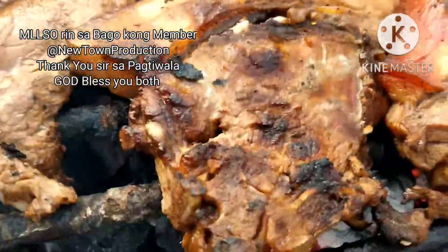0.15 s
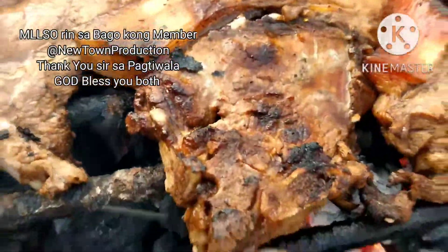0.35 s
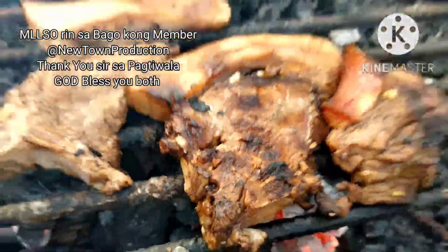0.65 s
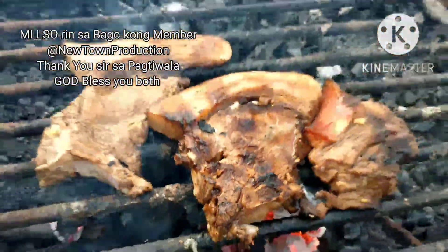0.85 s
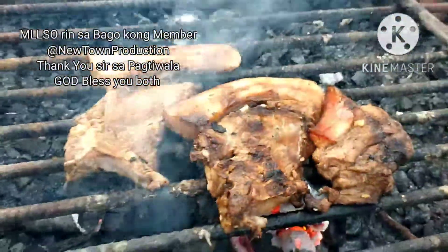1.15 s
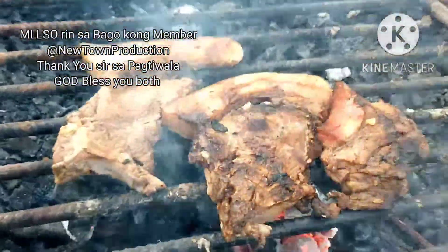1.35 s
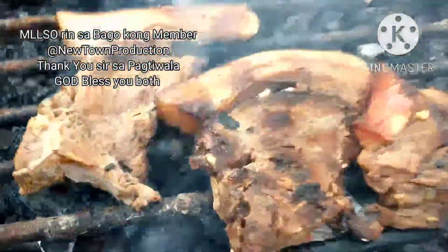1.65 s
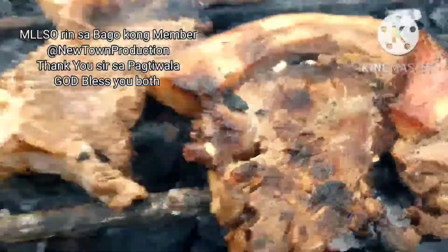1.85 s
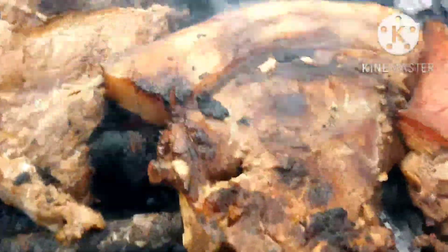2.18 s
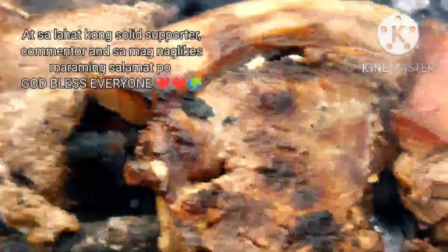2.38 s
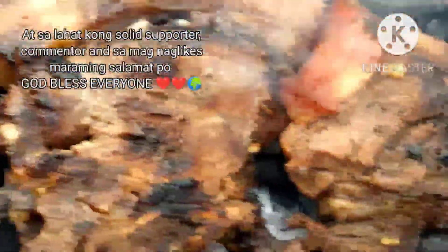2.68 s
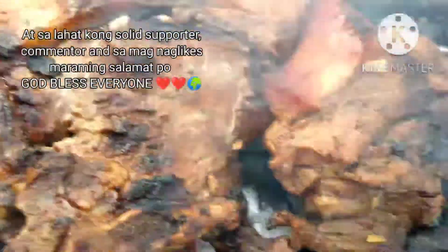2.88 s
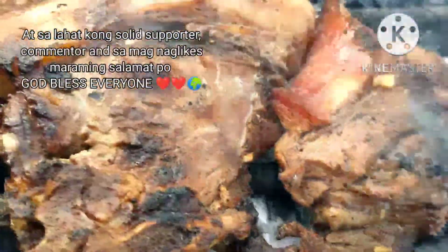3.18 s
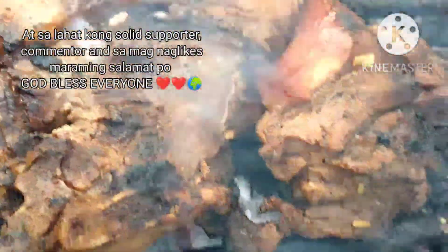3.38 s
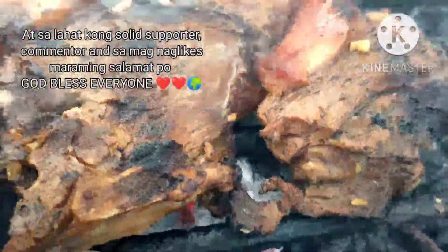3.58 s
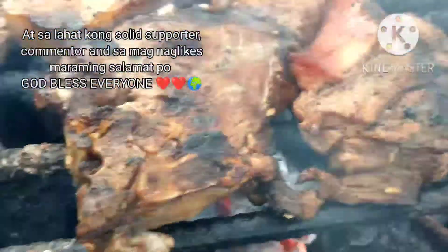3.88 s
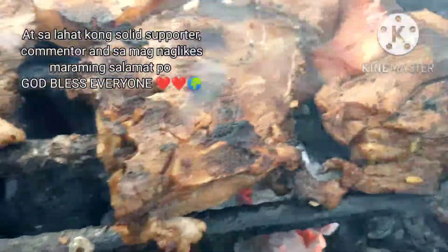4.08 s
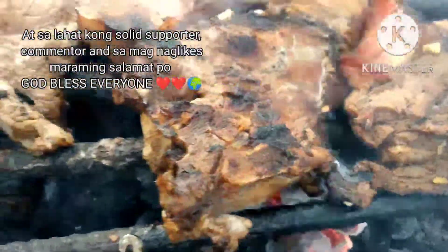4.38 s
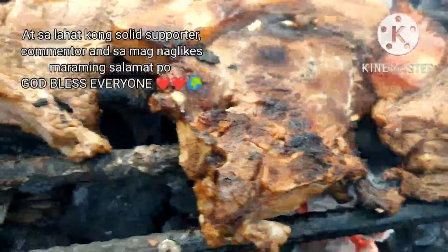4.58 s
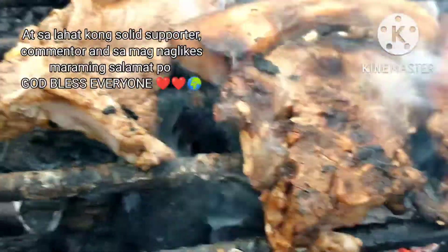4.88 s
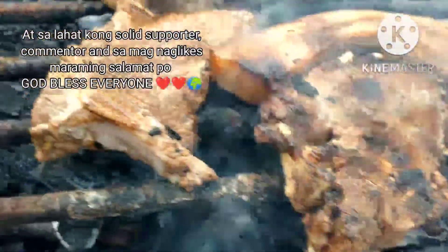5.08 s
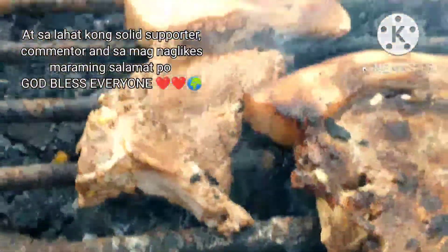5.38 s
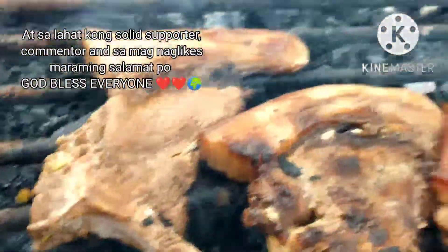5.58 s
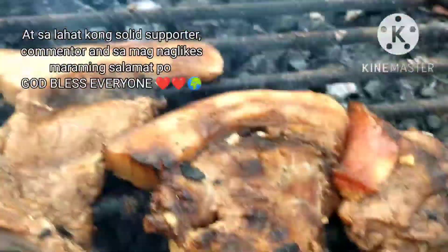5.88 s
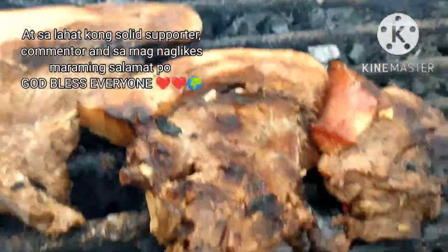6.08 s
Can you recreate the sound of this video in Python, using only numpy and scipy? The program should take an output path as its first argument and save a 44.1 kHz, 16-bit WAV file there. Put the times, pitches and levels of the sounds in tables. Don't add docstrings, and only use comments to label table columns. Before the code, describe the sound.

Meat sizzles over charcoal, close to a hand-held phone outdoors. A bright fizz of tiny bubbles runs throughout over a soft rush of embers and air, with uneven low handling rumble and a very faint far motor. A pop and steam spit open the scene; at 0.3 s a hard, loud knock on the phone coincides with a sharp crack, and a softer thud follows at 0.6. Small pops continue to 1.0, where the treble briefly dulls. From 1.25 to 1.8 the sizzle thins; a far rooster crows faintly until 2.5, with hollow spits at 1.6 and 1.9. Frying swells, fullest around 3.2. A strong snap and hissing jet burst at 3.7, then many ticks. Faint low bird calls come at 4.2 and 4.8, thin whistles from 4.5. Scuffs and a crisp double pop land at 4.8-5.0, with a weak second crow after 5.0. Two more pops at 6.0 close it, sizzle continuing.

```python
import sys
import numpy as np
from scipy import signal
from scipy.fft import rfft, irfft
from scipy.io import wavfile
from scipy.ndimage import uniform_filter1d

SR = 44100
rng = np.random.default_rng(int(sys.argv[2]) if len(sys.argv) > 2 else 0)


def nominal_scale(level):
    x = np.asarray(level, float) / 20
    return 10 ** x


def waveform_to_disk(signal):
    frames = np.transpose(np.atleast_2d(signal))
    scaled = np.clip(frames, -1, 1) * 32767
    samples = np.round(scaled).astype(np.int16)
    wavfile.write(sys.argv[1], SR, samples)


N = 275602
USUAL_FRYING_DB, USUAL_HAND_DB = -65, -75


def evened(x):
    return x / np.sqrt(np.mean(x ** 2) + 1e-20)


def read(points, hz):
    f, value = np.transpose(points)
    return np.interp(np.log(hz + 1), np.log(f + 1), value)


def add(mix, s, sound):
    part = mix[max(round(s * SR), 0):][:len(sound)]
    part += sound[:len(part)]


def bump(hz, centre_hz, octaves):
    return -6 * (np.log2((hz + 1) / centre_hz) / octaves) ** 2


def coloured(x, gain_db):
    db = np.maximum(gain_db(abs(np.fft.fftfreq(1024, 1 / SR))), -90)
    minimum_phase = np.exp(np.conj(signal.hilbert(np.log(nominal_scale(db)))))
    taps = np.fft.ifft(minimum_phase).real
    return signal.oaconvolve(x, taps[:512])[:len(x)]


def slow(hz):
    return evened(signal.sosfilt(signal.butter(2, hz, fs=SR, output="sos"), rng.standard_normal(N)))


def patchy(x, depth_db):
    z = signal.stft(x, nperseg=1024, noverlap=768)[2]
    patches = uniform_filter1d(rng.standard_normal(z.shape), 6, 0)
    patches = evened(uniform_filter1d(patches, 10, 1))
    return signal.istft(z * nominal_scale(depth_db * patches), nperseg=1024, noverlap=768)[1][:N]


# t/s, frying level/dB, hand level/dB
FRYING = [(0.0, -64, -57), (0.1, -65, -71), (0.55, -62, -75), (0.68, -64, -71.5), (1.25, -73.5, -85),
          (1.56, -72.5, -78.5), (1.77, -68, -72), (2.21, -68, -78), (2.47, -64.5, -74.5),
          (2.82, -63.5, -76), (3.15, -59, -74), (3.48, -63, -77.5), (3.9, -60, -75), (4.61, -66, -78.5),
          (4.84, -63.5, -68), (5.53, -66.5, -83), (5.83, -68, -78.5), (6.25, -64, -75)]


def control(column, s):
    table = np.transpose(FRYING)
    return np.interp(s, table[0], table[column])


def curve(column):
    return nominal_scale(control(column, np.arange(N) / SR))


# f/Hz, level/dB
PORT = [(400, -23), (2500, -28.5), (3600, -24), (4900, -24.5), (5700, -20.5), (6500, -14), (7400, -5.5),
        (7900, -7.5), (8770, -3), (9500, -7.5), (10500, -16), (11800, -26.5), (14800, -30.5), (16500, -33)]


def port_db(hz):
    return read(PORT, hz)


def fizz():
    bubbles_per_s, spread_db, steam_share = 2000, 4.5, 0.79
    chance = bubbles_per_s * np.exp(0.32 * slow(28)) / SR
    size = nominal_scale(spread_db * np.minimum(rng.exponential(1, N), 5)) * rng.choice([-1, 1], N)
    bubbles = evened(size * (rng.random(N) < chance))
    steam = rng.standard_normal(N) * nominal_scale(2.9 * slow(60))
    sizzle = coloured(bubbles + steam_share * steam, port_db)
    return curve(column=1) * nominal_scale(-1.5) * evened(patchy(sizzle, depth_db=1.5))


# f/Hz, level/dB
WASH = [(300, 4), (420, 3.5), (750, 4.5), (1630, -4), (2500, -1), (3700, -1.5), (4900, -9.5), (6000, -11),
        (11000, -12.5), (16000, -12.5)]


def ember_wash(air):
    wash = irfft(air * nominal_scale(read(WASH, HZ)) * (HZ > 250), N) * nominal_scale(1.2 * slow(30))
    s = np.arange(N) / SR
    frying = 0.3 * (control(1, s) - USUAL_FRYING_DB)
    hand = 0.15 * (control(2, s) - USUAL_HAND_DB)
    return nominal_scale(-80.5 + frying + hand) * nominal_scale(1.5) * evened(patchy(wash, depth_db=3.0))


# f/Hz, level per Hz/dB
RUMBLE = [(18, -47.5), (30, -19), (43, -17), (83, -2.5), (172, 2), (302, -16.5), (400, -20), (520, -43.5),
          (880, -120)]


def hand_rumble(air):
    rumble = evened(irfft(air * nominal_scale(read(RUMBLE, HZ)), N))
    return rumble * curve(column=2) * nominal_scale(-1.0 + 1.5 * slow(8.7))


# f/Hz, width/Hz, level/dB
HUM = [(120, 12, -90), (168, 10, -81.5), (192, 3.1, -88), (215, 8, -86.5)]


def motor_hum():
    lines = np.zeros(len(HZ))
    for f, width, db in HUM:
        lines += nominal_scale(db) / np.sqrt(width + width * ((HZ - f) / (width / 2)) ** 4)
    return irfft(rfft(rng.standard_normal(N)) * lines * np.sqrt(SR / 2), N)


HZ = np.fft.rfftfreq(N, 1 / SR)


def jet(length, low_db, centre_hz, upper_db, hiss_db):
    t = np.arange(6000) / SR / length
    shape = np.minimum(t / .22, 1) * np.exp(-1.5 * t ** 2.0)
    noise = rng.standard_normal((4, 6000))
    sputter = nominal_scale(2.6 * evened(uniform_filter1d(noise[3], 45)))

    def modes(f):
        return 1.5 * np.cos(f / 190 + 3 * noise[3, 0])

    def low_hollow(f):
        return bump(f, centre_hz, 0.91) + bump(np.maximum(f, 2000), 2000, .45)

    def hiss_colour(f):
        return np.maximum(port_db(f), -26 - 3.5 * (f > 9000) - 3.0 * (f > 13000))

    low = coloured(coloured(noise[0] * sputter, low_hollow), modes)
    upper = coloured(noise[1] * sputter, lambda f: bump(f, 3450, .3) + modes(f))
    hiss = coloured(noise[2] * sputter, hiss_colour)
    return shape * (nominal_scale(low_db) * evened(low) + nominal_scale(upper_db) * evened(upper) + nominal_scale(hiss_db) * evened(hiss))


# t/s, length/s, low hollow level/dB, upper hollow level/dB, hiss level/dB
SPITS = [(.006, 0.055, -66.5, -60, -43), (0.298, .016, -80.5, -80, -52), (0.883, .028, -81, -68.5, -56.5),
         (0.976, 0.026, -83.5, -61, -47), (1.598, 0.048, -56, -56.5, -50.5), (1.619, 0.04, -68, -66, -63),
         (1.897, 0.023, -70, -68.5, -54), (1.905, .023, -47, -47, -41.5), (1.929, 0.049, -67.5, -73, -62.5),
         (2.302, 0.033, -86, -89, -54), (2.4, 0.072, -94, -89, -58.5), (2.833, .029, -75.5, -71.5, -60),
         (3.033, 0.031, -84.5, -68, -50.5), (3.061, 0.07, -81.5, -71.5, -57.5),
         (3.47, .013, -70.5, -77, -67), (3.66, 0.069, -57.5, -58.5, -39.5),
         (3.843, .007, -68.5, -67, -68.5), (4.348, .031, -71.5, -71, -61), (4.651, .05, -85, -85, -60),
         (1.607, .014, -80, -60, -46), (4.898, .04, -65, -66, -47), (5.144, 0.02, -84.5, -75, -52.5),
         (5.972, 0.024, -72.5, -68, -45), (0.101, 0.025, -65, -67.5, -59), (0.669, 0.031, -72, -73, -58)]


def spits(mix):
    for s, length, low_db, upper_db, hiss_db in SPITS:
        add(mix, s, jet(length, low_db, 1400, upper_db, hiss_db))


# t/s, length/s, low hollow level/dB, its centre f/Hz, upper hollow level/dB
SCUFFS = [(0.3188, 0.02, -36, 800, -41), (.335, 0.036, -52, 700, -59.5), (.01, 0.069, -61.5, 540, -67),
          (.4, 0.03, -67.5, 1264, -68.5), (1.311, 0.038, -67.5, 850, -80), (1.539, 0.032, -69, 1286, -79),
          (1.606, .014, -43, 950, -45), (1.839, 0.03, -67, 700, -79.5), (2.424, .05, -72, 400, -81),
          (2.505, 0.024, -59, 987, -57.5), (3.13, 0.034, -55.5, 1400, -61),
          (3.6734, 0.0026, -36, 1400, -38), (3.7575, 0.016, -53, 1400, -59),
          (3.917, 0.0079, -63, 1202, -77), (3.991, 0.11, -74, 1180, -75), (4.652, 0.05, -66, 1300, -70),
          (4.799, .055, -57, 600, -63), (4.819, 0.017, -58, 905, -53.5), (4.9815, 0.026, -46, 600, -57),
          (5.308, 0.014, -56, 1000, -60), (0.622, 0.042, -58, 400, -90), (.681, 0.036, -61.5, 905, -70)]


def scuffs(mix):
    for s, length, low_db, centre_hz, upper_db in SCUFFS:
        add(mix, s, jet(length, low_db, centre_hz, upper_db, upper_db - 3))


def pop(db, ring_hz, snap_db):
    t = np.arange(1800) / SR
    noise = rng.standard_normal((3, len(t)))
    centres_s = np.array([[.0008], [.0025], [.0004]])
    swell = np.exp(-((t - centres_s) / .00042) ** 2)
    crack = 1.8 * noise[0] + 0.85 * np.cos(2 * np.pi * ring_hz * t)
    crack = crack * (swell[0] + 0.3 * swell[1])
    droplets = nominal_scale(3.5 * evened(uniform_filter1d(noise[2], 30)))
    spray = nominal_scale(-15.5 - 60 * t / 0.078) * noise[1] * droplets * (t > .001)

    def ring_colour(f):
        peak = .85 * port_db(f) + bump(f, ring_hz, .6)
        low_side = bump(np.minimum(f, 6000), 6000, .8)
        high_side = bump(np.maximum(f, 11500), 11500, .25)
        return np.maximum(peak, port_db(f) - 2 + low_side + high_side)

    def snap_colour(f):
        return np.maximum(bump(f, 11500, .2) - 4, bump(f, 5600, .3) - 4)

    ring = coloured(crack + spray, ring_colour)
    snap = coloured(noise[2] * swell[2], snap_colour)
    return nominal_scale(db) * (ring / abs(ring).max() + nominal_scale(snap_db + 5.5) * snap / abs(snap).max())


# t/s, peak level/dB, ring f/Hz, level of the wide snap before it/dB
POPS = [(0.0214, -23.5, 7270, -23), (.2838, -40, 8600, -20), (0.3116, -14, 9300, -19),
        (0.328, -23, 7300, -22), (.3205, -30, 8700, -45), (0.3705, -38, 7360, -20),
        (0.4742, -39.5, 7760, -35), (.61, -39.5, 8040, -36), (0.6528, -39.5, 8340, -27),
        (.7023, -33.5, 7580, -40), (.8824, -38, 7500, -28), (0.9785, -29.5, 7550, -45.5),
        (.9874, -40.5, 7700, -43), (1.0078, -41.5, 7660, -39), (1.2573, -36.5, 8110, -16.5),
        (1.611, -39, 8800, -25), (2.303, -34, 8720, -34), (2.395, -34.5, 7780, -40),
        (3.038, -42.5, 8580, -20.5), (3.4998, -29, 8070, -47), (3.6592, -39, 8600, -40),
        (3.6704, -33, 8600, -40), (3.6738, -15, 7800, -20), (3.6876, -30, 8400, -32.5),
        (3.7148, -38, 8500, -35), (3.7685, -42, 8200, -40), (3.9946, -43, 8240, -32),
        (4.3027, -38, 8940, -36.5), (4.9025, -22.5, 7700, -30), (4.9083, -22.5, 8290, -12),
        (5.1451, -35, 8270, -28.5), (5.975, -32.5, 8680, -31), (5.9819, -27, 9000, -32.5)]


def large_pops(mix):
    for s, db, ring_hz, snap_db in POPS:
        add(mix, s, pop(db, ring_hz, snap_db))


# t/s, peak level/dB
TICKS = [(0.0371, -31), (.18, -46.5), (0.245, -44), (0.5418, -43), (.8619, -44), (1.0144, -41.5),
         (1.1493, -46.5), (1.6362, -43), (1.703, -46), (1.915, -38), (2.2992, -43.5), (2.3537, -41.5),
         (2.5144, -42), (2.6447, -44), (3.0989, -45.5), (3.529, -42), (3.9321, -41), (4.0613, -42.5),
         (4.0846, -40), (4.148, -41), (4.2659, -40), (4.3261, -41), (4.5323, -43), (4.5655, -42.5),
         (4.7673, -43.5), (4.9834, -41.5), (5.131, -43), (5.2733, -44), (5.7177, -44.5), (5.9625, -49.5)]
SMALL_S = [.203, .4095, 1.059, 1.6711, 1.7744, 2.0931, 2.142, 2.1954, 2.5733, 2.7222, 2.8812, 2.9342,
           2.9926, 3.2181, 3.2874, 3.467, 3.867, 4.0272, 4.2033, 4.2852, 4.346, 4.4054, 4.7077, 5.3113,
           5.3477, 5.5377, 5.5762, 5.6261, 5.7967, 6.0926]


def lesser_pops(mix):
    strays = 44
    stray_s = (np.arange(strays) + rng.random(strays)) * N / SR / strays
    bubbles = list(TICKS)
    for times, over_db in ((SMALL_S, 18), (stray_s, 14.5)):
        for s in times:
            frying_db = USUAL_FRYING_DB + .5 * (control(1, s) - USUAL_FRYING_DB)
            bubbles.append((s, frying_db + over_db + 2.0 * rng.standard_normal()))
    for s, db in bubbles:
        ring_hz = 8417 + 400 * rng.standard_normal()
        snap_db = -50 + 13 * rng.standard_normal()
        add(mix, s, pop(db, ring_hz, snap_db))


# t/s, peak level/dB, f/Hz, time to fall 60 dB/s, first push (1 or -1)
KNOCKS = [(0.045, -38.5, 95, 0.057, 1), (.32, -1.5, 1000, .0035, 1), (.3199, -13.5, 458, .044, 1),
          (.3204, -13.5, 220, .05, -1), (.3229, -16, 108, .085, 1), (.3281, -15.5, 3340, .01, 1),
          (.3272, -24, 3340, .012, 1), (.3292, -26, 4050, .012, 1), (.3321, -9.5, 700, .006, -1),
          (.3209, -22, 1290, .045, 1), (.333, -27, 625, .05, 1), (.3212, -32, 785, .05, 1),
          (.3212, -27, 2600, .008, 1), (.607, -40, 150, .05, -1), (.6163, -26, 125, .06, 1),
          (.6245, -23, 105, .065, 1), (.6252, -30, 430, .024, 1), (.625, -40, 720, .03, 1),
          (.3202, -14, 700, .006, 1), (2.745, -58, 85, 0.16, 1), (4.821, -30.5, 800, 0.0067, 1),
          (4.811, -47, 109.4, .06, 1), (4.8215, -46, 3600, .01, 1), (4.984, -43, 260, 0.043, 1),
          (6.19, -61, 80, .08, 1), (1.604, -50, 250, 0.063, 1), (.84, -64, 106, .1, 1),
          (3.674, -45, 450, .015, 1), (3.698, -50, 700, .012, 1), (1.6105, -36, 800, .008, -1)]


def knocks(mix):
    t = np.arange(4000) / SR
    for s, db, hz, t60, direction in KNOCKS:
        start = 1 - np.exp(-(t * hz * 3.5) ** 2)
        swing = np.sin(2 * np.pi * hz * t) * start
        add(mix, s, np.sign(direction) * nominal_scale(db - 60 * t / t60) * swing)


def call(rows, overtones_db):
    s, hz, db = np.transpose(rows)
    t = np.arange(s[0], s[-1], 1 / SR)
    waver = evened(uniform_filter1d(rng.standard_normal((2, SR)), 500))[:, :len(t)]
    turns = np.cumsum(np.interp(t, s, hz) * (1 + .006 * waver[0])) / SR
    tone = sum(nominal_scale(o) * np.sin(2 * np.pi * (k + 1) * turns) for k, o in enumerate(overtones_db))
    level = nominal_scale(np.interp(t, s, db) + 3.3 * waver[1] - 1.0)
    return s[0], np.sqrt(2) * tone * level * signal.windows.tukey(len(t), .1)


# t/s, f/Hz, level/dB
CROWS = [
    [(1.25, 865, -94), (1.3, 876, -93), (1.33, 890, -79.5), (1.36, 875, -90.5), (1.43, 866, -95.5)],
    [(1.51, 963, -91), (1.55, 990, -82), (1.7, 985, -92), (1.78, 1003, -84), (1.85, 1019, -66),
     (1.885, 1012, -76), (1.92, 1010, -70), (1.96, 1005, -81), (2.05, 975, -88), (2.15, 1000, -100)],
    [(2.16, 865, -95), (2.2, 858, -85), (2.36, 861, -80), (2.42, 855, -86.5), (2.52, 855, -76),
     (2.62, 847, -99)],
    [(5.0, 915, -83), (5.05, 912, -90), (5.14, 914, -88), (5.24, 926, -89), (5.38, 915, -90),
     (5.5, 908, -100)],
]
OVERTONES_DB = [-5, 0, -21, -30]


def rooster(birds):
    for rows in CROWS:
        add(birds, *call(rows, OVERTONES_DB))


# t/s, length/s, level/dB, centre f/Hz, width/octaves
RASPS = [(4.661, .034, -65, 2050, .2), (4.662, .03, -66, 3300, .1), (1.252, .02, -76, 3600, .1),
         (1.968, .025, -77, 1400, .1), (2.195, .025, -82, 3900, .12), (5.306, .014, -63, 3300, .08),
         (1.315, .03, -71, 880, .1), (3.758, .014, -59, 2600, .4), (1.606, .014, -48, 2300, .3),
         (1.905, .02, -51, 2200, .3), (4.982, .012, -62, 3100, .12), (4.803, .012, -63, 3200, .15),
         (1.606, .016, -52, 5300, .25), (1.904, .022, -52, 5300, .2), (3.6732, .004, -36, 5900, .2),
         (1.604, .02, -51, 550, .4), (4.652, .046, -70, 5800, .3), (4.907, .006, -47, 4800, .25),
         (4.888, .014, -56, 8500, .2), (3.675, .005, -48, 3600, .3)]


def rasps(mix):
    for s, length, db, centre_hz, octaves in RASPS:
        size = round(length * SR)
        noise = coloured(rng.standard_normal(3000), lambda f: bump(f, centre_hz, octaves))
        add(mix, s, nominal_scale(db) * evened(noise[600:][:size]) * signal.windows.tukey(size, .6))


# t/s, f/Hz, level/dB
CROW_LINES = [
    [(1.93, 3620, -90), (1.97, 3620, -82), (2.05, 3600, -85), (2.19, 3640, -90)],
    [(1.66, 3900, -93), (1.8, 4000, -88), (1.9, 4050, -90)],
    [(4.52, 3900, -92), (4.58, 3750, -86), (4.66, 3600, -85), (4.72, 3580, -92)],
    [(4.84, 3920, -90), (4.95, 3900, -88), (5.1, 3880, -93), (5.3, 3900, -95)],
]


def crow_lines(birds):
    for rows in CROW_LINES:
        add(birds, *call(rows, [-4]))


# t/s, f/Hz, level/dB
FAR_CROWS = [
    [(4.15, 735, -96), (4.18, 742, -82), (4.26, 740, -83), (4.34, 733, -96)],
    [(4.7, 728, -94), (4.75, 724, -86), (4.785, 724, -78), (4.83, 722, -84), (4.9, 720, -92)],
]
FAR_OVERTONES_DB = [-3, -7, 0, -5, -16]


def far_crows(birds):
    for rows in FAR_CROWS:
        add(birds, *call(rows, FAR_OVERTONES_DB))


def blurred(birds):
    echoes = rng.standard_normal(9000) * nominal_scale(-60 * np.arange(9000) / SR / .5)
    return birds + .35 * signal.oaconvolve(birds, echoes / np.linalg.norm(echoes))[:N]


def scene():
    air = rfft(rng.standard_normal(N))
    mix = fizz() + ember_wash(air) + hand_rumble(air) + motor_hum()
    birds = np.zeros(N)
    for layer in (spits, scuffs, large_pops, lesser_pops, knocks, rasps):
        layer(mix)
    for voice in (rooster, crow_lines, far_crows):
        voice(birds)
    return (mix + blurred(birds))[None]


def starved(x):
    hz, _, z = signal.stft(x, SR, nperseg=1024, noverlap=768)
    patches = uniform_filter1d(rng.standard_normal(z.shape[1:]), 8, 0)
    patches = uniform_filter1d(patches, 8, 1)
    holes = patches < np.quantile(patches, .2)
    haze_db = (hz[:, None] > 11800) * (2.5 - 14 * holes)
    return signal.istft(z * nominal_scale(haze_db), nperseg=1024, noverlap=768)[1][:, :N]


# start t/s, end t/s
DROPOUTS = [(.891, 0.94), (0.949, 1.019)]


def dulled(x):
    top = signal.sosfiltfilt(signal.butter(12, 8130, "high", fs=SR, output="sos"), x)
    t = np.arange(N) / SR
    lost = uniform_filter1d(sum((t > a) & (t < b) for a, b in DROPOUTS) * 1., 90)
    return x - (1 - nominal_scale(-22.5)) * lost * top


def low_pass(x):
    return signal.sosfilt(signal.butter(12, 16480, fs=SR, output="sos"), x)


def record(dry):
    x = signal.sosfiltfilt(signal.butter(3, 58, "high", fs=SR, output="sos"), dry)
    x = x + nominal_scale(-108) * slow(60)
    x = irfft(rfft(x) * nominal_scale(-20 * (HZ > 15830)), N)
    mix = dulled(starved(x))
    return low_pass(mix)


dry = scene()
out = record(dry)
waveform_to_disk(out)
```